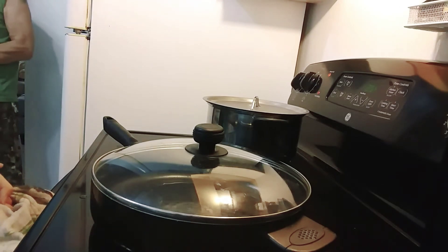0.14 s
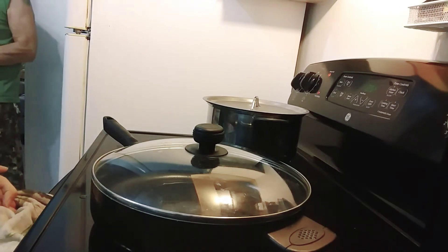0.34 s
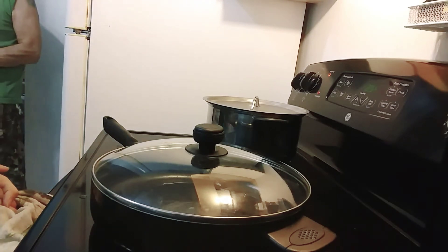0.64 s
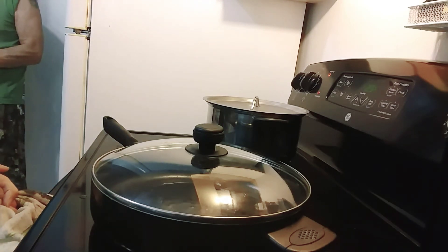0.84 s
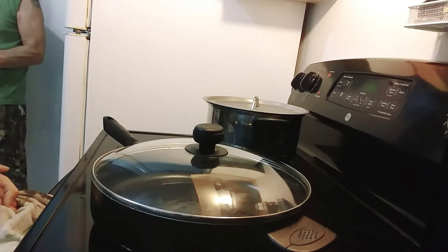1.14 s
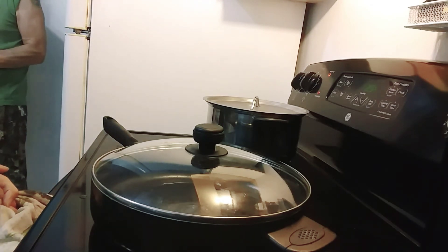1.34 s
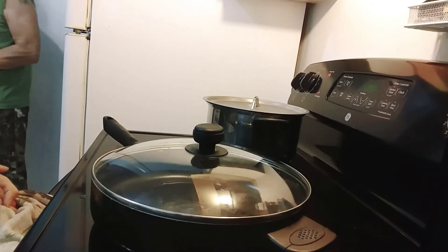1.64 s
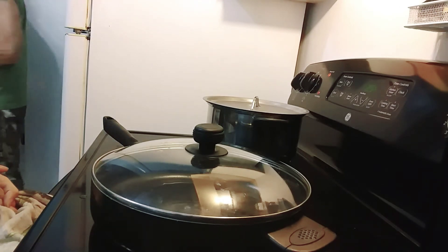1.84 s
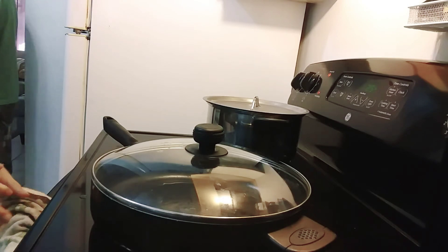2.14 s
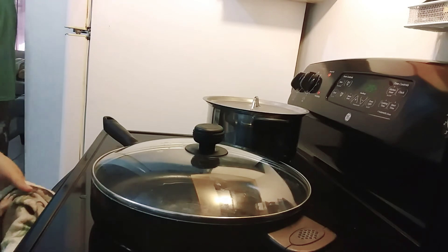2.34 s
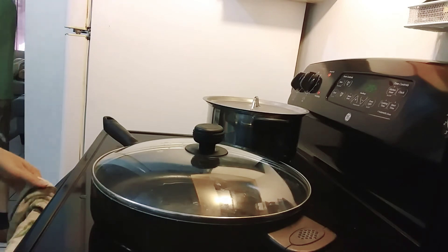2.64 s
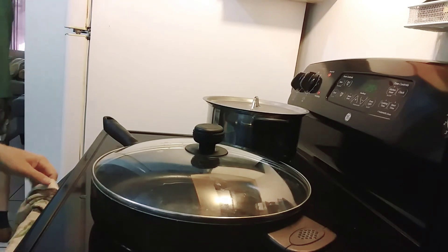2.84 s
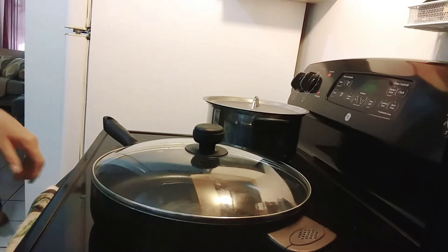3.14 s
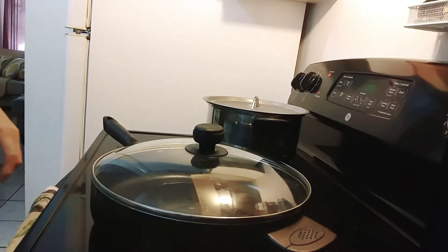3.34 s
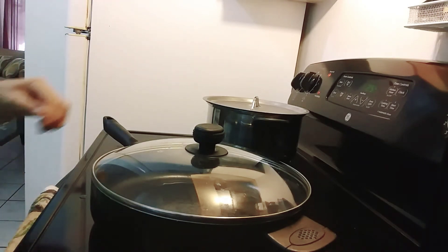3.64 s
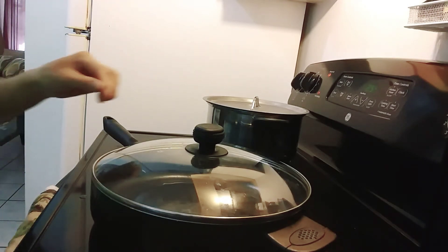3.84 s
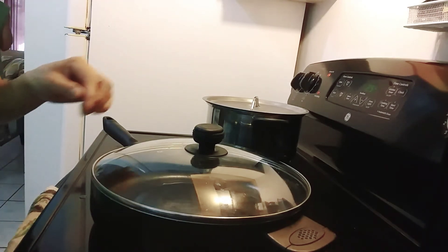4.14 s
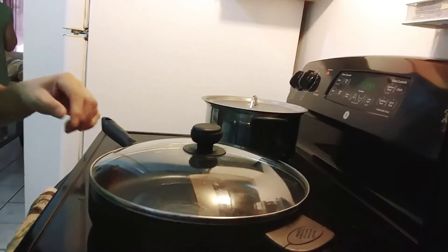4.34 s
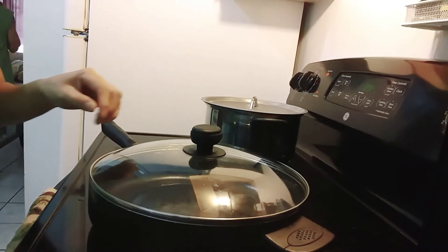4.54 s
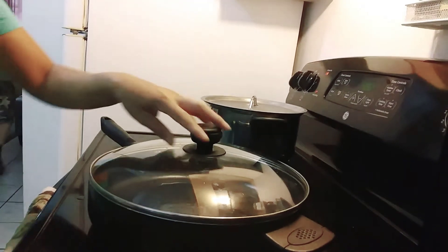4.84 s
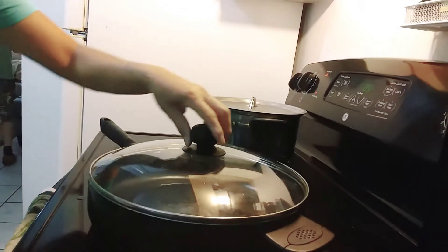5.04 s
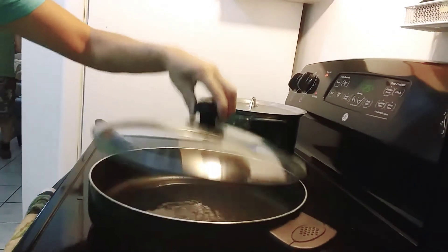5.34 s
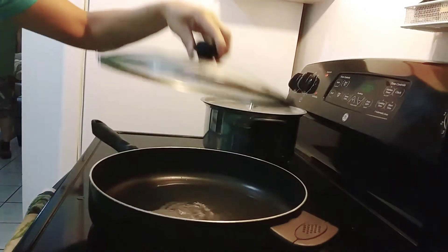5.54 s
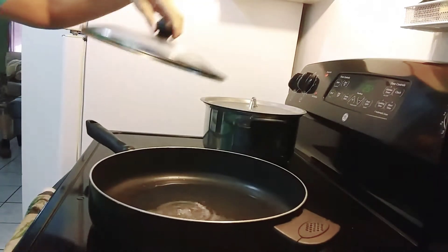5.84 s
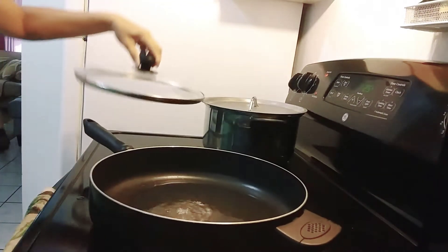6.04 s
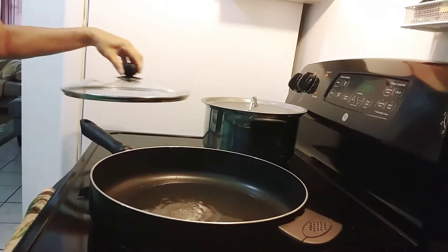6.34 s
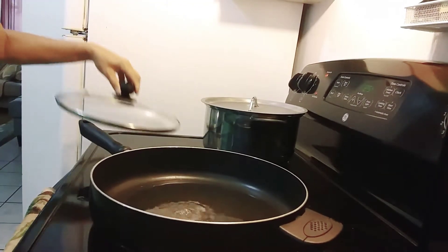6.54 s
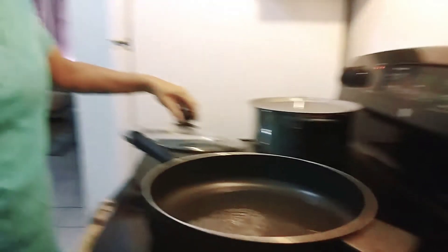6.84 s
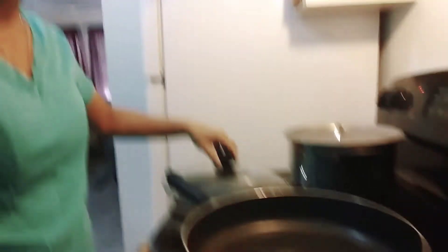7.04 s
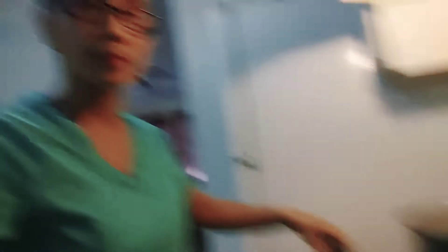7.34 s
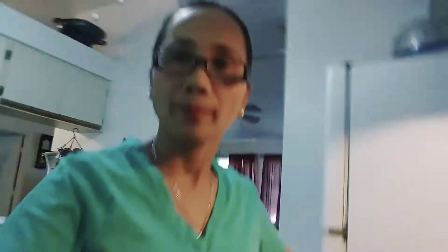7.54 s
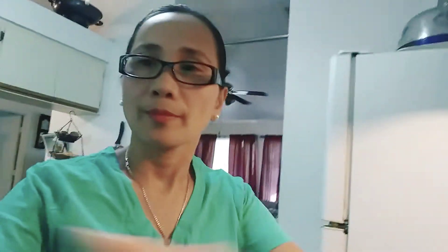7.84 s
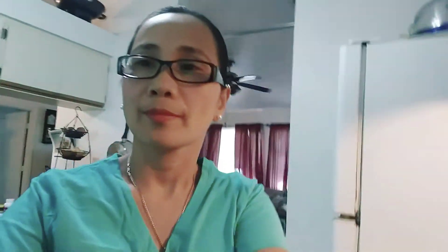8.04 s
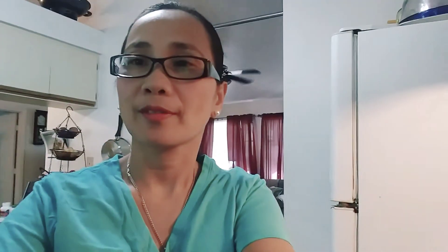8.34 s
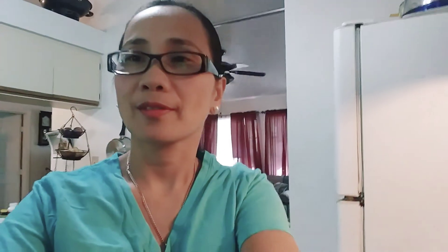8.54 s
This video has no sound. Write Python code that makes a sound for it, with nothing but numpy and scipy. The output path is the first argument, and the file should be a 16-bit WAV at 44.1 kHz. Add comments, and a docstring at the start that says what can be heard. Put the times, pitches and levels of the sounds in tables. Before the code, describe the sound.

Close to a phone microphone in a small, faintly humming kitchen, oil in a covered pan crackles with fine bubbles, steam hiss, plops and sharp pops. Around five seconds the lid comes off and the sizzle becomes more open. The lid knocks the rim, clanks loudly with a glassy ring, then scrapes and rattles onto the stove top as the crackling continues.

```python
"""Water spits out of hot oil in a covered pan, close to a phone in a small humming kitchen: crackling bubbles over
steam hiss, plops, and pops that each stir up a flurry. From 4.9 s the pan's resonances shift as the glass lid lifts;
it knocks the rim at 5.4 s, clanks on metal at 6 s, and scrapes and rattles onto the stove top by 7.2 s.
The oil crackles on in the open. Bubbles are short decaying sines, steam and impacts shaped noise, struck parts
sums of decaying modes."""
import sys
import numpy as np
from scipy import signal
from scipy.fft import rfft, irfft
from scipy.io import wavfile
from scipy.ndimage import uniform_filter1d

SR = 44100
rng = np.random.default_rng(int(sys.argv[2]) if len(sys.argv) > 2 else 0)


def to_wav(sig):
    """Store sig (one row per channel, or 1-D mono) as 16-bit WAV at the path in sys.argv[1].

    Samples outside -1..1 are clipped; the rate is SR.
    """
    pcm = np.clip(np.atleast_2d(sig), -1, 1) * 32767
    pcm = np.round(pcm).astype(np.int16)
    wavfile.write(sys.argv[1], SR, pcm.T)  # frames by channels


N = 383229
T = np.arange(N) / SR

# Room air spectrum. Each row: frequency in Hz, relative level in dB per Hz.
KITCHEN = [(30, -40), (60, -27), (120, -9.5), (250, -5), (500, -5), (1000, -38.5), (4000, -2.5),
           (10000, -38), (15000, -52.5)]
# Mains hum and appliance motor tones. Each row: frequency in Hz, rms level in dB.
HUM = [(59.2, -91), (118.4, -83), (178, -85.5), (231.5, -79), (333, -88.5), (355, -78), (414, -78.5)]
# Soft low thuds. Each row: start in seconds, peak in dB, pitch in Hz.
THUDS = [(0.247, -58, 115)]

# Blows of the lid on the pan rim as it lifts, on metal, and on the stove top. Each row: start in seconds,
# level in dB, chatter decay constant in seconds, ring re chatter in dB, pitch favoured by the struck spot in Hz.
LIFT = [(5.3605, -11, .004, 9, 1235), (5.378, -27, .008, 8, 1200)]
CLANKS = [(5.989, -3.5, .018, -9, 1500), (6.005, -3.5, .014, -3, 444), (6.021, -3.5, .012, -5, 2000),
          (6.046, -10, .005, -14, 2900)]
SET_DOWN = [(6.894, -12, .004, 4, 900), (6.921, -23, .005, 3, 350), (6.973, -25, .006, 8, 740),
            (7.112, -26, .008, 0, 460), (7.146, -6, .006, 0, 400), (7.166, -18, .003, -3, 850),
            (7.208, -25, .005, 3, 280)]
# Chatter spectra on metal and on the stove top. Each row: frequency in Hz, relative level in dB per Hz.
CLANK = [(24, -67), (40, -32), (162, -4), (310, -12.5), (438, -1.5), (591, -18.5), (670, -9.5), (881, -4.5),
         (1160, -8.5), (1450, -11.5), (1640, -10.5), (2990, -9.5), (4400, -12), (5600, -20), (15500, -48.5)]
STOVE_TOP = [(40, -38), (100, -14), (170, -9), (250, -9), (340, -1), (450, -1), (560, -10), (740, -4),
             (1050, -8), (1400, -9), (2200, -13), (4200, -14), (6000, -30), (14000, -42)]
# Ringing modes of pan rim, glass lid and stove top. Each row: frequency in Hz, relative level in dB, t60 in seconds.
RIM_MODES = [(460, -14, .11), (900, -16, .1), (1225, 0, .09), (1355, -1, .11), (3800, -5, .07)]
LID_MODES = [(179, -9, .36), (444, 2, .27), (706, -10, .3), (882, -8, .25), (1022, -5, .3),
             (1244, -10, .35), (1460, -6, .5), (1536, -11, .3), (1962, -11, .5), (2068, -7, .33),
             (2505, -7, .28), (2623, -9, .3), (2824, -13, .6), (2912, -7, .3), (3260, -11, .28),
             (3738, -9, .3), (3875, -14, .55), (4765, -13, .25)]
STOVE_MODES = [(119, -10, .35), (175, -7, .35), (243, -8, .28), (350, -2, .17), (385, 0, .11),
               (458, 0, .25), (600, -11, .16), (703, -3, .16), (744, 0, .16), (853, -11, .18),
               (1015, -3, .2), (1180, -9, .14), (1470, -7, .2)]
# Scrapes of the settling rim. Each row: start in seconds, peak in dB, t60 in seconds.
SCRAPES = [(6.93, -34, .7), (7.2, -27, .45)]

# Drawn-out sputters. Each row: start in seconds, length in seconds, peak in dB, lowest pitch in Hz.
SPUTTERS = [(1.048, 0.024, -35.5, 490), (2.44, 0.14, -31, 756)]
# Biggest bubbles, deep in the oil. Each row: start in seconds, peak in dB, pitch in Hz.
PLOPS = [(.159, -46, 540), (.245, -35, 1070), (1.049, -40, 470), (1.221, -49, 543), (1.63, -42, 735),
         (1.735, -46, 452), (1.9, -41, 735), (2.129, -48, 570), (2.756, -45, 560), (3.825, -47.5, 575),
         (3.935, -44, 560), (4.245, -41, 339), (4.38, -47, 570), (4.486, -48, 570), (4.692, -43, 760),
         (5.074, -44, 580), (6.602, -44, 554), (6.645, -38, 860), (6.672, -50, 275), (6.75, -43, 581),
         (7.477, -39, 904), (7.607, -46, 550), (7.789, -34, 990), (7.974, -19.5, 902), (8.024, -42, 503),
         (8.332, -33, 907)]
# Loudest steam pops. Each row: start in seconds, level in dB (crack and flurry together), pitch in Hz.
POPS = [(0.2366, -16, 1840), (0.276, -18, 3960), (0.389, -22, 1270), (0.4265, -17, 3180),
        (0.5292, -15, 2920), (0.7485, -17, 2670), (0.7911, -18, 3030), (0.8225, -17, 3890),
        (0.8643, -17, 2730), (0.9304, -19, 1800), (1.0423, -16, 3670), (1.1695, -18, 3690),
        (1.2106, -18, 3680), (1.2914, -16, 1750), (1.4349, -20, 1600), (1.4843, -21, 2330),
        (1.5472, -17, 2120), (1.6014, -19, 2210), (1.6384, -16, 3040), (2.0183, -18, 1700),
        (2.0736, -17, 3700), (2.246, -19, 1570), (2.3151, -18, 2660), (2.4437, -18, 1530),
        (2.5974, -19, 2250), (2.7334, -16, 4010), (2.7925, -18, 3920), (3.0002, -18, 2450),
        (3.0694, -13, 2400), (3.0815, -16, 2500), (3.2441, -14, 1530), (3.2828, -15, 2990),
        (3.377, -18, 1970), (3.4245, -18, 3920), (3.469, -15, 3000), (3.5164, -16, 2690),
        (3.5872, -17, 1980), (3.6286, -14.5, 3840), (3.7155, -16, 3890), (3.9363, -19, 1480),
        (3.9924, -17, 3170), (4.0349, -16, 2930), (4.1064, -15, 2640), (4.2101, -16, 3010),
        (4.3625, -20, 2030), (4.486, -16, 2730), (4.7068, -13, 2890), (4.8323, -16, 1910),
        (4.9093, -9, 3780), (4.9986, -17, 3670), (5.0641, -15, 2610), (5.218, -17, 1720),
        (5.2614, -15, 2930), (5.5415, -15, 1720), (5.611, -15, 2640), (5.6865, -14, 4300),
        (5.7538, -13, 2930), (5.8455, -13, 1780), (5.9549, -15, 2120), (6.1555, -14, 2670),
        (6.2308, -14, 2910), (6.3125, -16, 4460), (6.4055, -13, 1460), (6.4528, -16, 1520),
        (6.5456, -17, 2960), (6.6363, -9, 1700), (6.7588, -16, 1610), (6.8174, -17, 1910),
        (6.9352, -14, 1500), (7.0168, -15, 1720), (7.1065, -12, 1740), (7.3225, -14, 2910),
        (7.3857, -17, 2590), (7.412, -16, 2100), (7.4768, -15, 1610), (7.6618, -14, 3790),
        (7.6961, -17, 2890), (7.7581, -17, 2810), (7.7851, -17, 1520), (7.8794, -16, 1390),
        (7.9258, -15, 2190), (7.9745, -15, 1340), (8.0162, -15, 1490), (8.0706, -17, 1750),
        (8.171, -18, 2250), (8.3468, -13, 1360), (8.4122, -17, 3070), (8.4834, -15, 2840),
        (8.5265, -16, 2310), (8.6133, -15, 3790)]
# Simmer level curve. Each row: time in seconds, fine crackle in dB, larger deeper bubbles in dB (before offsets).
SIMMER = [(0.0, -28, -35.5), (0.15, -32.5, -37.5), (2.74, -32.5, -38), (4.12, -30.5, -35.5),
          (4.42, -33.5, -33.5), (5.9, -27, -33.5), (6.4, -31, -37), (6.99, -27, -30.5), (7.44, -30, -33.5),
          (8.69, -31.5, -34)]
# Crackle spectrum. Each row: frequency in Hz, relative level in dB per Hz.
SIZZLE = [(400, -36), (750, -39.5), (950, -23.5), (1150, -14), (1400, -8.5), (3000, -2.5), (4400, -0.5),
          (5200, -13), (6300, -14), (8000, -13), (10000, -28), (12000, -58.5), (15000, -68.5)]
# Pan resonances. Each row: frequency in Hz, width in Hz, gain lid on in dB, gain lid off in dB.
PAN_MODES = [(571, 30, 1.5, 12.5), (756, 14, -7.5, -2), (868, 50, -9, 12.5), (1379, 42, -4.5, 6.5),
             (1702, 28.5, 7.5, 12), (1960, 47, 1, 0), (2257, 27, 4, 1.5), (2863, 40, 3.5, -3.5)]

HUM_WANDER = 2  # phase drift of each tone
RING_RISE_S = 0.0013  # time constant of a struck part ringing up
CATCHES_PER_S = 260
PLOP_CYCLES = 30  # cycles to -60 dB, so the deepest ring longest
STRAYS_PER_S, STRAY_DB, STRAY_SPREAD_DB = 6, -23, 3.5  # weaker random pops
STRAY_LOW_HZ, STRAY_HIGH_HZ = 1583, 4610
MID_POP_HZ = 2110  # pitch of a middling pop; bigger drops sound lower
CRACK_DB = 0.5  # crack re the pop's level
THUMP_DB, THUMP_DB_PER_OCTAVE = -48, -18  # thump re crack at MID_POP_HZ, and its slope with pop pitch
FLURRY_ATTACK_S, FLURRY_DECAY_S = 0.003, 0.024  # linear rise, decay time constant
FINE_DB, COARSE_DB = -1.2, -2.2  # simmer between flurries, re its curve
LID_OFF_S, LID_SHIFT_S = 4.93, 0.24
TOP_HZ = 15500


def undb(db):
    """dB to amplitude factor."""
    return 10 ** (np.asarray(db) / 20)


def unit(x):
    """Scale to rms 1."""
    return x / np.sqrt(np.mean(x ** 2))


def peak(x):
    """Scale to peak 1."""
    return x / np.abs(x).max()


def fade(t, t60):
    """Exponential decay, 60 dB down after t60."""
    return np.exp(-np.log(1000) * t / t60)


def add(out, s, x):
    """Mix x into out from time s."""
    i = max(int(s * SR), 0)
    out[i:i + len(x)] += x[:max(N - i, 0)]


def band(x, kind, hz, order=2):
    """Butterworth filter."""
    sos = signal.butter(order, np.minimum(hz, SR / 2 - 1), kind, fs=SR, output="sos")
    return signal.sosfilt(sos, x)


def colour(x, points, size=4096):
    """Minimum-phase filter with the given (Hz, dB) spectrum, built by folding the cepstrum."""
    hz, db = np.transpose(points)
    grid_hz = np.arange(size // 2 + 1) * SR / size
    log_gain = np.log(undb(np.interp(np.log(grid_hz + 1), np.log(hz), db)))
    cepstrum = irfft(log_gain)
    cepstrum[1:size // 2] *= 2
    cepstrum[size // 2 + 1:] = 0
    response = irfft(np.exp(rfft(cepstrum)))
    return signal.fftconvolve(x, response)[:len(x)]


def space(x, near_db, near_t60, room_db, room_t60):
    """Direct sound, quick echoes off pan and splashback, then the duller kitchen; fresh echoes per call."""
    t = T[:SR // 3]
    near, far = rng.standard_normal((2, len(t)))
    near = near * fade(t, near_t60) * (t > .001)
    far = band(far * fade(t, room_t60) * (t > .008), "low", 3900, order=1)
    response = undb(near_db) * near / np.linalg.norm(near) + undb(room_db) * far / np.linalg.norm(far)
    response[0] += 1
    return signal.fftconvolve(x, response)[:len(x)]


def bubble(t, hz, cycles, rise_cycles=0.24):
    """A bursting bubble swells and rings as a sine, 60 dB down after the given cycles."""
    swell = 1 - np.exp(-t * hz / rise_cycles)
    return np.sin(2 * np.pi * hz * t) * swell * fade(t, cycles / hz)


def kitchen():
    """Quiet room air (shaped noise) and slightly unsteady appliance hum (sines with random-walk phase)."""
    hum = np.zeros(N)
    for hz, db in HUM:
        drift = np.cumsum(rng.standard_normal(N)) * HUM_WANDER * hz / SR
        hum += undb(db) * unit(np.sin(2 * np.pi * hz * T + drift))
    air = unit(colour(rng.standard_normal(N), KITCHEN))
    return undb(-66.0) * air + hum


def thuds():
    """Dull knocks somewhere in the kitchen: low, quickly damped rings."""
    out = np.zeros(N)
    for s, db, hz in THUDS:
        thud = band(bubble(T[:SR // 2], hz, cycles=13), "bandpass", [70, 200])
        thud = space(thud, near_db=-3, near_t60=.06, room_db=-2.0, room_t60=0.36)
        add(out, s, undb(db) * peak(thud))
    return out


def scrapes():
    """The sliding rim catches and slips at random, drumming on the stove top until it comes to rest."""
    out, t = np.zeros(N), T[:SR * 2 // 3]
    for s, db, t60 in SCRAPES:
        caught = rng.random(len(t)) < CATCHES_PER_S / SR
        catches = caught * rng.choice([-1, 1], len(t)) * fade(t, t60)
        rumble = band(catches, "bandpass", [110, 1200], order=3)
        rumble = band(rumble, "low", 450, order=1)
        rumble = space(rumble, near_db=0, near_t60=.08, room_db=-4, room_t60=.4)
        add(out, s, undb(db) * peak(rumble))
    return out


def lid(blows, surface, modes, blur_hz, spot_db_per_octave):
    """The rim chatters on a surface at each blow, and the struck parts ring on, wavering as the lid rocks."""
    out, t = np.zeros(N), T[:SR * 2 // 3]
    hz, mode_db, t60 = np.transpose(modes)[:, :, None]
    for s, db, chatter_s, ring_db, spot_hz in blows:
        chatter = colour(rng.standard_normal(len(t)) * np.exp(-t / chatter_s), surface)
        chatter = space(chatter, near_db=4, near_t60=0.11, room_db=-4, room_t60=0.4)
        # each blow favours the modes near its spot's pitch
        gain = undb(mode_db - spot_db_per_octave * np.abs(np.log2(hz / spot_hz)))
        # random-walk phase broadens each mode
        steps = rng.standard_normal((len(hz), len(t)))
        waver = np.cumsum(steps, axis=1) * np.sqrt(2 * np.pi * blur_hz / SR)
        tones = gain * np.sin(2 * np.pi * hz * (t + s) + waver) * fade(t, t60)
        ring = np.sum(tones, axis=0) * (1 - np.exp(-t / RING_RISE_S))
        ring = band(ring, "low", 1.3 * hz.max(), order=4)
        add(out, s, undb(db) * peak(peak(chatter) + undb(ring_db) * peak(ring)))
    return out


def sputters():
    """Steam forces its way out through the oil in a longer, low rush of band-passed noise."""
    out, t = np.zeros(N), T[:SR // 2]
    for s, length_s, db, hz in SPUTTERS:
        rush = rng.standard_normal(len(t)) * fade(np.maximum(t - length_s, 0), t60=0.28)
        add(out, s, undb(db) * peak(band(rush, "bandpass", [hz, hz * 2.3], order=4)))
    return out


def plops():
    """Large bubbles swell with a small splash and ring briefly, their pitch rising a little as they surface."""
    out, t = np.zeros(N), T[:SR // 3]
    for s, db, hz in PLOPS:
        splash = rng.standard_normal(len(t)) * fade(t, PLOP_CYCLES / hz)
        plop = bubble(t * (1 + 0.6 * t), hz, cycles=PLOP_CYCLES, rise_cycles=4) + undb(1) * splash
        plop = band(plop, "bandpass", [hz * .7, hz * 1.6])
        plop = space(plop, near_db=0, near_t60=.07, room_db=-5, room_t60=.3)
        add(out, s, undb(db) * peak(plop))
    return out


def stray_pops():
    """Weaker pops, one at random in each slot. Each row: start in seconds, level in dB, pitch in Hz."""
    rows = []
    for k, (when, size, pitch) in enumerate(rng.random((int(STRAYS_PER_S * N / SR), 3))):
        db = STRAY_DB + STRAY_SPREAD_DB * (2 * size - 1)
        hz = STRAY_LOW_HZ * (STRAY_HIGH_HZ / STRAY_LOW_HZ) ** pitch
        rows.append(((k + when) / STRAYS_PER_S, db, hz))
    return rows


def pops():
    """Water drops flash to steam: a crack with a short ring, then a droplet spatter; big drops also thump the pan."""
    out, t = np.zeros(N), T[:SR // 5]
    for s, db, hz in list(POPS) + stray_pops():
        spatter = rng.standard_normal(len(t)) * (fade(t, 0.011) + undb(-15) * fade(t, 0.05))
        crack = bubble(t, hz, cycles=19, rise_cycles=1) + undb(-6.5) * spatter
        crack = band(crack, "bandpass", [1180, 4400], order=6)
        # the thump sits on the lowest pan resonance
        thump = bubble(t, PAN_MODES[0][0], cycles=51) + undb(24.5) * spatter
        thump = band(thump, "bandpass", [330, 900], order=3)
        thump_db = THUMP_DB + THUMP_DB_PER_OCTAVE * np.log2(hz / MID_POP_HZ)
        pop = peak(crack) + undb(thump_db) * peak(thump)
        pop = space(pop, near_db=2, near_t60=.045, room_db=-7, room_t60=.3)
        add(out, s, undb(db + CRACK_DB) * peak(pop))
    return out


def flurries(stir_db, db_per_octave):
    """Gain of the flurry each listed pop stirs up; the slope lets high or low pops stir more. Powers add."""
    power, t = np.zeros(N), T[:SR // 2]
    swell = np.minimum(t / FLURRY_ATTACK_S, 1) * np.exp(-t / FLURRY_DECAY_S)
    for s, db, hz in POPS:
        flurry_db = db + stir_db + db_per_octave * np.log2(hz / MID_POP_HZ)
        add(power, s, (undb(flurry_db) * swell) ** 2)
    return np.sqrt(power)


def crackle(per_s, low_hz, high_hz, cycles, spread_db, flurry_db, count=4):
    """Countless small bubbles burst at a few spots in the pan, their loudness drifting together at random."""
    out = np.zeros(N)
    steps = np.repeat(rng.standard_normal(N // 600 + 1), 600)
    flurry = np.tanh(unit(uniform_filter1d(steps, 300)))
    for _ in range(count):
        spot = np.zeros(N)
        for when, size, pitch, ring in rng.random((int(per_s * N / SR / count), 4)):
            # few loud bursts, many faint ones
            db = -spread_db * np.log(size + 1 / 20) + flurry_db * flurry[int(when * N)]
            hz = low_hz * (high_hz / low_hz) ** pitch
            burst = bubble(T[:1200], hz, cycles * (.5 + ring), rise_cycles=0.54)
            add(spot, when * N / SR, undb(db) * burst)
        out += space(spot, near_db=-1, near_t60=0.089, room_db=-8.5, room_t60=0.16)
    return out


def sizzle():
    """Fine and coarse crackle with a hiss of steam and faint low bubbling, swelling in flurries."""
    s, fine_db, coarse_db = np.transpose(SIMMER)
    fine_simmer = undb(FINE_DB + np.interp(T, s, fine_db))
    coarse_simmer = undb(COARSE_DB + np.interp(T, s, coarse_db))
    # high pops stir the fine bubbles, low pops the large ones
    fine_gain = np.hypot(fine_simmer, flurries(stir_db=-26, db_per_octave=6.0))
    coarse_gain = np.hypot(coarse_simmer, flurries(stir_db=-19.5, db_per_octave=-7.0))
    fine = unit(crackle(per_s=420, low_hz=2200, high_hz=5400, cycles=12, spread_db=5.5, flurry_db=3.5))
    # steam escapes with every burst, so the hiss follows the crackle
    hiss = band(rng.standard_normal(N), "high", 3400)
    steam = unit(hiss * uniform_filter1d(np.abs(fine), 64))
    coarse = unit(crackle(per_s=170, low_hz=1080, high_hz=2350, cycles=13, spread_db=3.8, flurry_db=3))
    low = crackle(per_s=28, low_hz=479, high_hz=1081, cycles=32, spread_db=2, flurry_db=-3)
    low = unit(band(low, "high", 570))
    bright = undb(-3.0) * unit(colour(fine + undb(-6.0) * steam, SIZZLE))
    deep = undb(-2.5) * unit(colour(coarse, SIZZLE)) + undb(-29.5) * low
    return fine_gain * bright + coarse_gain * deep


def pan(oil):
    """The pan rings along with the oil; lifting the lid shifts the weight of its resonances."""
    lid_off = np.clip((T - LID_OFF_S) / LID_SHIFT_S, 0, 1)
    out = oil.copy()
    for hz, width_hz, covered_db, open_db in PAN_MODES:
        ring = signal.lfilter(*signal.iirpeak(hz, hz / width_hz, fs=SR), oil)
        out += undb(covered_db + lid_off * (open_db - covered_db)) * ring
    return out


def scene():
    """Everything at the phone, one channel."""
    lift = lid(LIFT, CLANK, RIM_MODES, blur_hz=14, spot_db_per_octave=2)
    lift = band(lift, "bandpass", [320, 4500], order=3)
    clank = lid(CLANKS, CLANK, LID_MODES, blur_hz=1.5, spot_db_per_octave=1.5)
    clank = band(clank, "high", 105, order=3)
    set_down = lid(SET_DOWN, STOVE_TOP, STOVE_MODES, blur_hz=6, spot_db_per_octave=5)
    set_down = band(set_down, "bandpass", [85, 7000], order=3)
    oil = pan(sizzle()) + pops() + plops() + sputters()
    glass_lid = lift + clank + set_down + scrapes()
    return (oil + glass_lid + thuds() + kitchen())[None]


def record(dry):
    """The phone clips at full scale and cuts everything above TOP_HZ steeply."""
    sos = signal.ellip(8, .2, 70, TOP_HZ, fs=SR, output="sos")
    return signal.sosfilt(sos, np.clip(dry, -1, 1))


dry = scene()
out = record(dry)
to_wav(out)
```